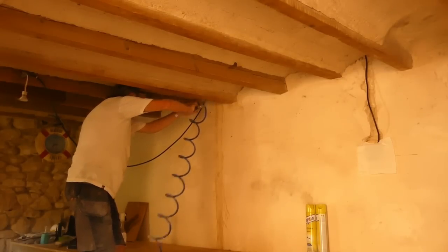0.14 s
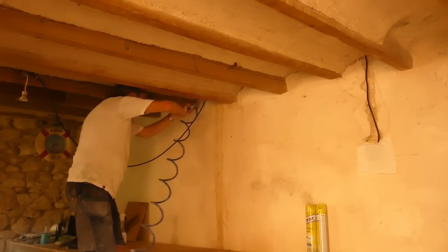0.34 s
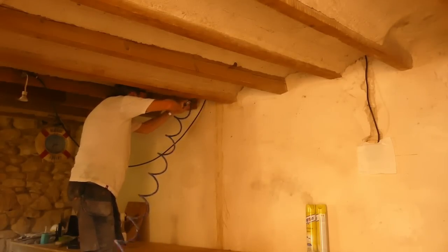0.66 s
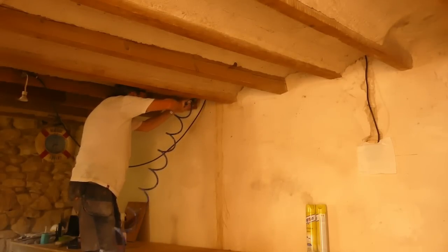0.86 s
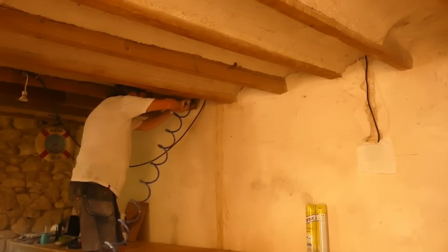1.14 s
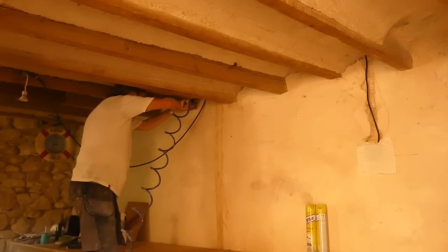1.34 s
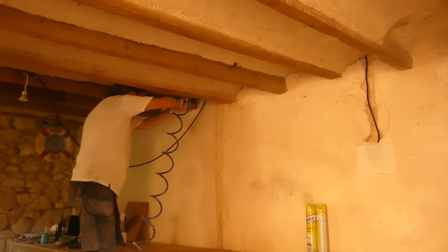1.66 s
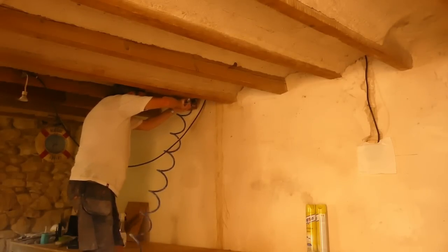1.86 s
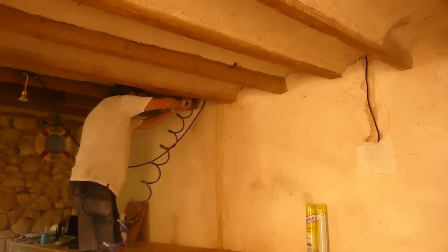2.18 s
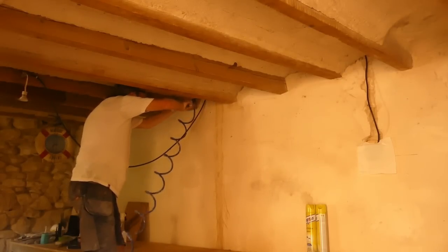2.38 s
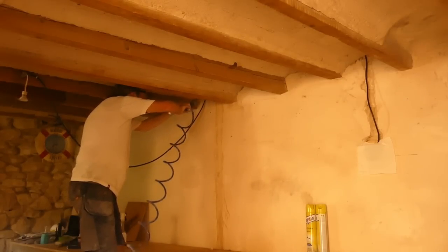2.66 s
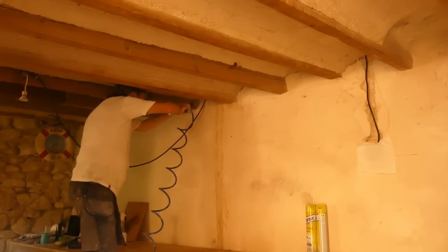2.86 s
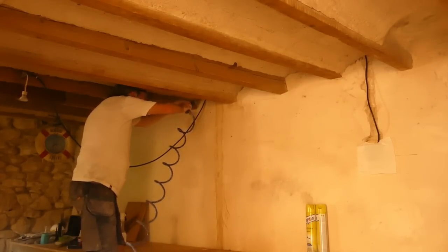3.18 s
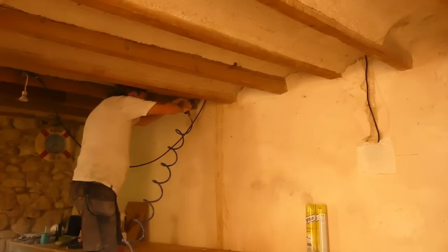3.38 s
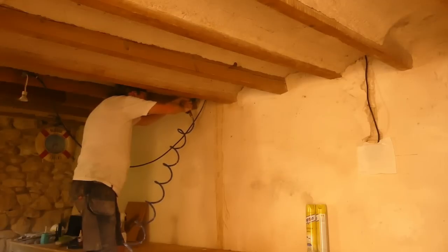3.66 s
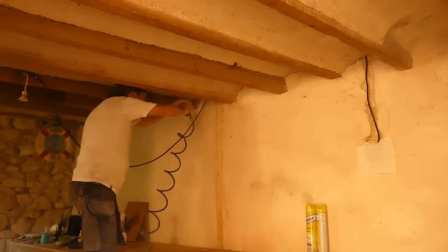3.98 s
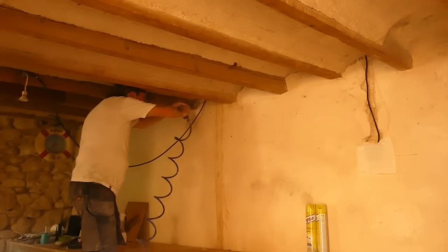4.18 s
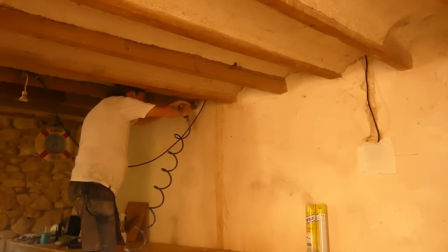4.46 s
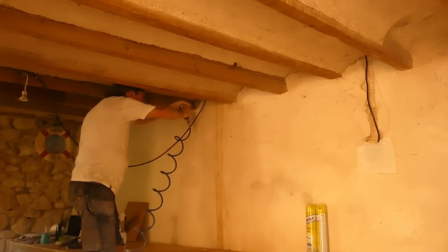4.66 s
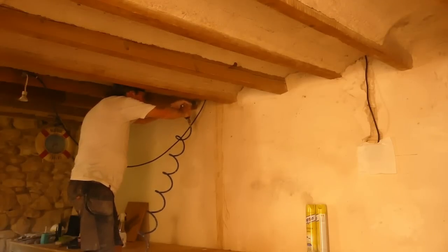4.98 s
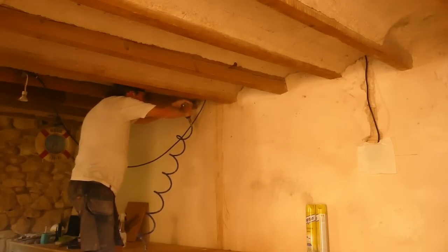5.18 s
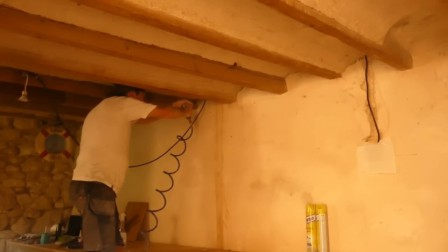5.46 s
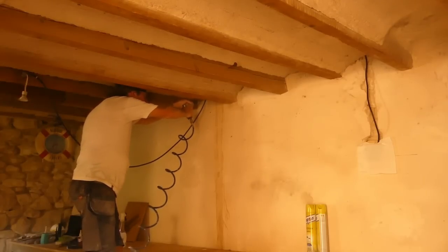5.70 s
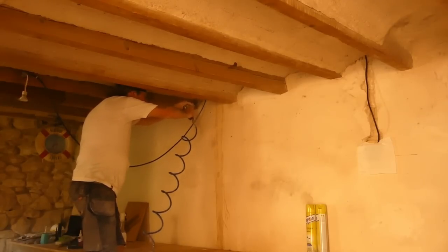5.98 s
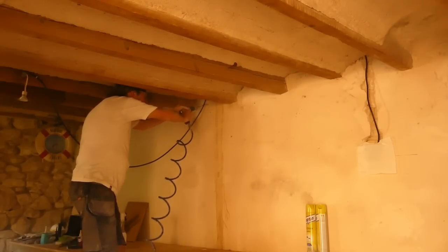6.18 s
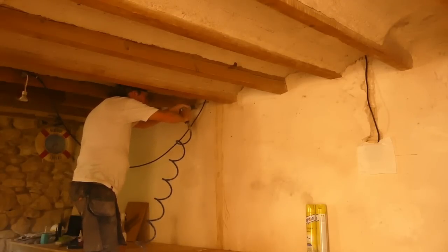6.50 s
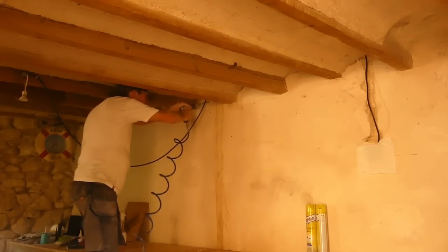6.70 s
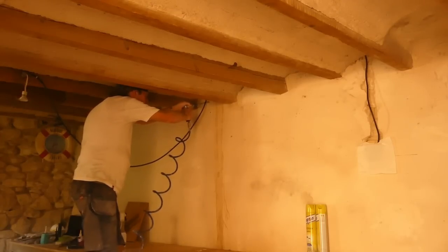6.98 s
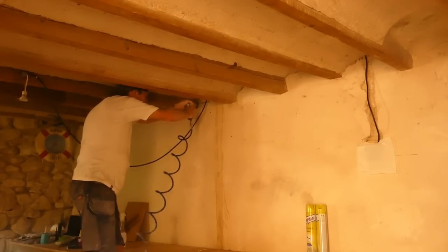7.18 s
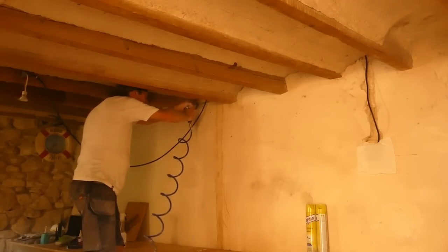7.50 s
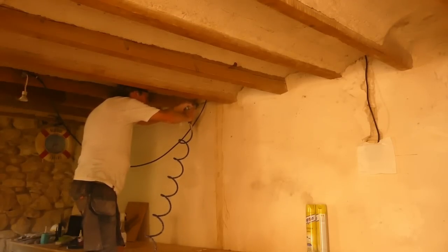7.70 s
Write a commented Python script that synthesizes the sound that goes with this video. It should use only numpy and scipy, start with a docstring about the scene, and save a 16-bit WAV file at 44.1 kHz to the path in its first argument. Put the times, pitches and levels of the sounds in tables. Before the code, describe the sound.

Indoors, four rapid pneumatic chisel bursts hammer into masonry, separated by falling rubble, pattering crumbs and a fine hiss of trickling sand.

```python
"""A bare room with a plastered stone wall: an air hammer chisels a channel into it in short bursts.
Each piston stroke thumps the wall, puffs out air as a dying hiss and makes the steel chisel ring and plaster crack.
In the pauses chunks crunch, clink and thud as they land, crumbs patter and fine sand hisses down the wall.
A faint machine hum stops just before the second burst; in the first pause the lifted chisel rings on.
The sound is nearly mono, and an automatic gain ducks it whenever the level passes a limit."""
import sys
import numpy as np
from scipy import signal
from scipy.fft import rfft, irfft, next_fast_len
from scipy.io import wavfile

SR = 44100
rng = np.random.default_rng(int(sys.argv[2]) if len(sys.argv) > 2 else 0)


def store_wav(level_fs):
    """Save 16-bit WAV to argv[1]."""
    pcm = np.round(np.clip(np.atleast_2d(level_fs), -1, 1) * 32767)
    wavfile.write(sys.argv[1], SR, pcm.T.astype(np.int16))


N = 345744
LEAD = SR // 2  # samples of run-up, so that hammer and room are already sounding at the start
TIME = np.arange(-LEAD, N) / SR  # s
SIZE = len(TIME)


def from_db(db):
    """Decibels to gain."""
    return 10 ** (np.asarray(db) / 20)


def unit_energy(x):
    """Scale a response so that it passes white noise at the same level."""
    return x / np.sqrt(np.sum(x ** 2) + 1e-20)


def at_hz(points, hz):
    """Read a table on a log-frequency axis."""
    f, value = np.transpose(points)
    return np.interp(np.log(np.maximum(hz, 1)), np.log(f), value)


def noise(spectrum):
    """Steady noise of a given colour, rms 1."""
    length = next_fast_len(SIZE)
    gain = from_db(at_hz(spectrum, np.linspace(0, SR / 2, length // 2 + 1)))
    coloured = irfft(rfft(rng.standard_normal(length)) * gain)[:SIZE]
    return unit_energy(coloured) * np.sqrt(SIZE)


def narrow(hz, width_hz):
    """Noise in one narrow resonance, rms 1: a tone that wavers faster the wider it is."""
    f = np.linspace(0, SR / 2, next_fast_len(SIZE) // 2 + 1)
    lines = rng.standard_normal(len(f)) + 1j * rng.standard_normal(len(f))
    resonance = 1 / (1 + ((f - hz) / width_hz * 2) ** 2)
    return unit_energy(irfft(lines * resonance)[:SIZE]) * np.sqrt(SIZE)


def butter(x, hz, kind, order=2):
    """Causal Butterworth filter."""
    return signal.sosfilt(signal.butter(order, hz, kind, fs=SR, output="sos"), x + 1e-18)


def lagged(x, lag_s):
    """One-pole average."""
    keep = np.exp(-1 / (lag_s * SR))
    return signal.lfilter([1 - keep], [1, -keep], x + 1e-18)


def clicks(times, sizes):
    """One impulse per contact."""
    at = np.clip(np.round(np.asarray(times) * SR).astype(int) + LEAD, 0, SIZE)
    return np.bincount(at, sizes, SIZE + 1)[:SIZE]


def through(x, response):
    """Play a signal through an impulse response."""
    return signal.oaconvolve(x, response)[:SIZE]


def fading(x, t60):
    """Each impulse becomes an envelope that jumps up and dies away by 60 dB in t60 seconds."""
    return signal.lfilter([1], [1, -from_db(-60 / (t60 * SR))], x + 1e-18)


def rings(modes):
    """One decaying wave per mode, its spectral peak at the mode's level; their energies sum to 1."""
    t = np.arange(SR // 2) / SR
    waves = [from_db(db - 60 * t / t60) / t60 * np.sin(2 * np.pi * hz * t) for hz, db, t60 in modes]
    return unit_energy(np.array(waves))


def strike(times, sizes, modes, spread_db):
    """Every contact excites every mode with a strength and sign of its own."""
    chance = rng.standard_normal((len(times), len(modes), 2))
    strength = from_db(spread_db * chance[..., 0]) * np.sign(chance[..., 1]) * sizes[:, None]
    waves = strength @ rings(modes)[:, :SR // 4]
    out = np.zeros(SIZE + SR)
    for s, wave in zip(times, waves):
        start = max(round(s * SR) + LEAD, 0)
        out[start:start + len(wave)] += wave
    return out[:SIZE]


# colour of the room tone: (f/Hz, relative level/dB per Hz)
ROOM_TONE = [(25, 0.5), (150, -13), (230, -9.5), (380, -6.5), (600, -14.5), (900, -15), (1800, -17),
             (2600, -24.5), (10000, -28.5), (16000, -36.5)]
# faint machine hum: (f/Hz, rms level/dB)
MACHINE_HUM = [(323, -74), (549, -67)]


def background(tone_db=-58.5, hum_ends_s=1.7, tone_drop_db=3):
    """Room tone under the hum and rumble of a distant machine; when it stops, the tone drops too."""
    hum = sum(np.sqrt(2) * from_db(db) * np.sin(2 * np.pi * hz * TIME) for hz, db in MACHINE_HUM)
    running = TIME < hum_ends_s
    return from_db(tone_db - tone_drop_db * ~running) * noise(ROOM_TONE) + hum * running


# how long each band lingers in the room: (f/Hz, T60/s)
ROOM_DECAY = [(80, 0.093), (280, 0.56), (700, 0.6), (2000, 0.27), (5000, 0.25), (9000, 0.18),
              (15000, 0.067)]


def diffuse(x, late_s=0.0031):
    """Dense reflections: each band's energy lingers as noise for its own time. Returns mid and side."""
    edges = np.geomspace(60, 17000, 17)  # Hz
    white = rng.standard_normal((2, 2, SIZE))
    out = 0
    for k, band in enumerate(zip(edges, edges[1:])):
        t60 = at_hz(ROOM_DECAY, np.sqrt(band[0] * band[1]))
        power = butter(x, band, "band", order=3) ** 2
        energy = lagged(lagged(power, t60 / np.log(1e6)), late_s)
        wash = butter(white[k % 2], band, "band", order=3)  # neighbouring bands use separate noise
        out = out + np.sqrt(energy) * wash / wash.std()
    return out


def reflections(x, count=48, first_s=.003, span_s=.06, t60=0.28, dull_hz=11000):
    """Early echoes off the nearby walls, beams and floor, weaker the later they arrive."""
    delay = first_s + span_s * rng.random(count)
    strength = from_db(-60 * delay / t60) * rng.choice([-1, 1], count)
    taps = np.bincount((delay * SR).astype(int), strength)
    return butter(through(x, unit_energy(taps)), dull_hz, "low", order=1)


def sand(swell_s=0.24, fade_db_per_s=17):
    """After each burst fine sand trickles down the wall as a soft hiss that swells and dies."""
    flow = 0
    for rate, (*_, sand_db) in zip(BLOW_RATES, HAMMER_BURSTS):
        since = np.maximum(TIME - rate[-1][0], 0)
        flow = flow + np.minimum(since / swell_s, 1) * from_db(sand_db - fade_db_per_s * since)
    return flow * noise([(800, -4.5), (2500, 5), (6000, -3.5), (10000, -7), (15500, -26)])


# colour of falling grit, for crumbs and rubble: (f/Hz, relative level/dB per Hz)
GRIT_COLOUR = [(400, 1.5), (1200, 1), (3000, 1), (5000, 2), (8000, -6.5), (11000, -9), (15500, -35)]


def crumbs(blow_times, fall_s=0.12, scatter_s=.42, level_db=-44, spread_db=4, tick_t60=0.0035):
    """Each blow loosens one crumb, which ticks on the floor after a fall of its own length."""
    times = blow_times + fall_s + scatter_s * rng.random(len(blow_times))
    uneven = np.clip(rng.standard_normal(len(times)), -2, 2)
    return fading(clicks(times, from_db(level_db + spread_db * uneven)), tick_t60) * noise(GRIT_COLOUR)


# chunks landing: (t/s, relative knock level/dB, relative gritty splash level/dB, top of the knock f/Hz)
CHUNKS = [(0.515, -32.5, -59, 1300), (.683, -64, -53.5, 4500), (0.71, -66, -49, 4500),
          (.997, -47, -48, 4500), (1.671, -44.5, -61.5, 4540), (2.635, -27.5, -23.5, 5000),
          (2.666, -11, -39.5, 5000), (2.831, -33, -52, 4500), (2.866, 5.5, -63, 4600),
          (2.972, -9, -18.5, 4800), (3.047, -8.5, -20, 5500), (3.158, -20, -60, 4000),
          (4.127, -7.5, -26, 6000), (4.317, -24.5, -44, 4000), (4.341, -24.5, -41, 3870),
          (4.417, -24.5, -45, 3870), (4.487, -29.5, -58, 4500), (4.513, -51, -34, 4500),
          (4.54, -23.5, -66, 4300), (6.261, -28.5, -36, 4500), (6.281, 0.5, -36, 4500),
          (6.485, -14, -66, 2220), (6.554, -25, -35, 3685)]
# colour of the crunch: (f/Hz, relative level/dB per Hz)
STONE_COLOUR = [(90, -49), (160, -5.5), (380, -7.5), (700, -6), (1300, -7), (2100, -1.5), (3100, -8),
                (4100, -17.5), (5200, -55), (9000, -84)]
# clink of a chunk as it lands: (f/Hz, relative level/dB, T60/s)
CHUNK_CLINK = [(953, -2, 0.24), (1280, -6.5, 0.26), (2060, 8.5, .15), (2184, 1, 0.39), (3480, -8.5, 0.021)]


def rubble(knock_db=-4, knock_t60=0.031, clink_db=7, span=6, splash_db=2, splash_t60=0.042):
    """Chunks crunch briefly as they land, clink in their own modes and shed a splash of grit."""
    times, knock, splash, tops = np.transpose(CHUNKS)
    stone = noise(STONE_COLOUR)
    out = fading(clicks(times, from_db(splash + splash_db)), splash_t60) * noise(GRIT_COLOUR)
    for s, db, top_hz in zip(times, knock, tops):
        crunch = fading(clicks([s], from_db([db + knock_db])), knock_t60) * stone
        clink = strike([s], from_db([db + clink_db]), CHUNK_CLINK, spread_db=2.0)
        # soft plaster lands duller than stone
        landing = butter(crunch + clink, top_hz / span, "high", order=1)
        out = out + butter(landing, top_hz, "low", order=5)
    return out


# ring of the chisel once it is lifted from the wall: (f/Hz, relative level/dB, T60/s)
FREE_CHISEL = [(1200, -13.5, 3.5), (2110, -11, 2.6), (4960, 9, 0.38), (9100, 5.5, 0.5)]


def ring_out(lift_s=0.076, level_db=-45, waver=0.039):
    """Free of the wall the chisel is hardly damped: a faint wavering ring, steady until the lift, then dying."""
    t = np.maximum(TIME - lift_s, 0)
    return sum(from_db(level_db + db - 60 * t / t60) * narrow(hz, waver * hz) for hz, db, t60 in FREE_CHISEL)


# bursts: (trigger squeezed t/s, relative force level/dB, relative wall boom level/dB,
#          extra level on the first blow/dB, level lost by the last blow/dB, loosened sand level/dB)
HAMMER_BURSTS = [(-.42, -2.5, -8, 7, 1.5, -53), (1.719, 1, 0, 0.5, 19, -37.5),
                 (3.478, -2.5, 1.5, -1, 43, -47.5), (4.817, -1.5, -0.5, -2, 15, -48),
                 (7.025, -5.5, 0, 0.5, -0.5, -72)]
# piston speed from first blow to last, one curve per burst: (t/s, blows per s)
BLOW_RATES = [
    [(-.4, 39.5), (.025, 39.5)],
    [(1.729, 38.53), (1.79, 43.58), (2.01, 40.45), (2.377, 42.37), (2.509, 40.86)],
    [(3.484, 39.81), (3.592, 44.4), (3.895, 41.31), (4.029, 30.69)],
    [(4.827, 37.7), (4.912, 43.42), (5.19, 40.57), (5.348, 46.83), (5.56, 45.06), (5.682, 39.94),
     (6.08, 37.8)],
    [(7.072, 39.43), (7.246, 44.3), (7.324, 43.12), (7.4, 47.77), (7.528, 38.77), (7.826, 40.09)],
]
# what every blow sets off, before its own force
BOOM_DB, THUMP_DB, HISS_DB, RING_DB = -14.5, -12.5, -17, -22
# the full hose changes the force of the first blows; then the pressure sags
SURGE_S, SAG_DB_PER_S = 0.13, 4.5
# the last blows change in force as the trigger is let go
RELEASE_S = 0.022
# the chisel rings more until it is seated, and again as it is eased off the wall
LOOSE_DB, SEAT_S, EASE_S = 4, .04, .09


def blows():
    """The piston strikes once per cycle: rows of time, boom, thump, hiss and ring strength."""
    rows = []
    for rate, (_, force_db, boom_db, surge_db, loss_db, _) in zip(BLOW_RATES, HAMMER_BURSTS):
        s, per_s = np.transpose(rate)
        t = np.arange(s[0], s[-1], 1 / SR)
        cycles = np.cumsum(np.interp(t, s, per_s)) / SR
        times = np.interp(np.arange(int(cycles[-1]) + 1), cycles, t)
        since, until = times - times[0], times[-1] - times
        surge = surge_db * np.exp(-since / SURGE_S)
        loss = loss_db * np.exp(-until / RELEASE_S)
        force = force_db + surge - SAG_DB_PER_S * since - loss
        loose = LOOSE_DB * (np.exp(-since / SEAT_S) + np.exp(-until / EASE_S))
        period = SR / np.interp(times, s, per_s)  # a blow carries the energy of one whole cycle
        parts = (BOOM_DB + boom_db, THUMP_DB, HISS_DB, RING_DB + loose)
        rows.append([times] + [from_db(force + db) * np.sqrt(period) for db in parts])
    return np.hstack(rows)


# boom of wall and room: (f/Hz, relative level/dB, T60/s)
WALL_BOOM = [(92.5, 0, 0.75), (127.6, -15, 0.67), (160.6, 0.5, 0.55), (198.2, 11, 0.63),
             (228.7, 16.5, 0.23)]
# higher resonances of wall and beams: (f/Hz, relative level/dB, T60/s)
BEAM_RING = [(269, 3, 0.063), (295.7, 8.5, 0.46), (320.9, 9, 0.52), (371.4, 2.5, 0.87), (445, -15.5, 1),
             (468, -4, 0.37), (470, -6, 0.86), (618, -5.5, 0.14), (777.4, 0, 0.39)]


def thumps(booms, pushes, puff_band_hz=(250, 420), puff_db=-11, wall_db=-1, beam_db=1,
           rumble_hz=68, beam_low_hz=230, soft_hz=560):
    """Each push is a short, soft pressure pulse followed by the ringing of wall and beams."""
    puff = unit_energy(butter(signal.unit_impulse(SR // 10), puff_band_hz, "band"))
    beams = butter(through(pushes, rings(BEAM_RING).sum(0)), beam_low_hz, "high")
    wall = butter(through(booms, rings(WALL_BOOM).sum(0)), rumble_hz, "high", order=4)
    body = from_db(puff_db) * through(pushes, puff) + from_db(beam_db) * beams + from_db(wall_db) * wall
    return butter(body, soft_hz, "low")


def valve(shut_db=-65, leak_db=-25.5, rise_s=0.023, fade_s=0.15):
    """Level of the air leak: it swells as the trigger is squeezed, holds, and fades once the piston runs."""
    out = 0
    for rate, (squeezed, *_) in zip(BLOW_RATES, HAMMER_BURSTS):
        first = max(rate[0][0], squeezed)
        when = [squeezed - rise_s, squeezed, first, first + fade_s]
        level = np.interp(TIME, when, [shut_db, leak_db, leak_db, shut_db], left=-np.inf, right=-np.inf)
        out = out + from_db(level)
    return out


# colour of the air jet: (f/Hz, relative level/dB per Hz)
JET_COLOUR = [(260, -29), (450, -6.5), (530, 2), (572, -5), (843, -2), (1050, -10.5), (1300, -6),
              (2070, -5.5), (2400, -9.5), (6830, -8.5), (9480, -3.5), (11700, -14), (16000, -13.5)]
# the jet whistles at the edges of the port: (f/Hz, width/Hz, level against the jet/dB)
PORT_WHISTLES = [(7970, 160, -14.5), (9330, 69, -10), (13500, 200, -20), (14900, 70, -26),
                 (15490, 42, -14.5)]


def exhaust(times, sizes, vent_t60=0.12, vent_db=-2.5, uneven_db=1.85):
    """The port opens on every stroke and the jet dies down; the valve leaks around the start of a burst."""
    uneven = from_db(uneven_db * rng.standard_normal(len(times)))
    vents = fading(clicks(times, sizes * uneven), vent_t60)
    vents = vents * np.sqrt(np.log(1e6) / (vent_t60 * SR))  # same energy per puff whatever its length
    whistles = sum(from_db(db) * narrow(hz, width_hz) for hz, width_hz, db in PORT_WHISTLES)
    return (from_db(vent_db) * vents + valve()) * (noise(JET_COLOUR) + whistles)


# chisel and barrel: (f/Hz, relative level/dB, T60/s)
STEEL_RING = [(1309, 0, 0.026), (2083, 0.5, 0.0073), (2700, -0.5, 0.033), (4500, -12.5, 0.048),
              (6400, -7.5, 0.026), (8000, -0.5, 0.058), (10700, -0.5, 0.059), (9530, 2, 0.042),
              (9350, 7, 0.0057), (12200, 6, 0.053), (15000, -23, 0.031), (15490, 3.5, 0.18)]


def chisel(times, sizes, forces, ring_db=-5, crack_db=-30, crack_t60=0.041, bite_db=1.5, jitter_s=.0003):
    """Steel rings in its modes and plaster cracks as a noise burst; some blows bite harder than others."""
    late, bite = rng.standard_normal((2, len(times)))
    times = times + jitter_s * late
    bite = from_db(bite_db * np.clip(bite, -2, 2))
    plaster = noise([(1000, -15.0), (4000, 0), (7000, -14.5), (9500, -10.0), (12000, -23.5), (16000, -0.5)])
    crack = fading(clicks(times, forces * bite), crack_t60) * plaster
    ring = strike(times, sizes * bite, STEEL_RING, spread_db=6.5)
    return from_db(ring_db) * ring + from_db(crack_db) * crack


def gain_control(x, limit_db=-14, attack_s=0.012, release_db_per_s=30, window_s=0.0034):
    """The gain drops quickly when the first channel's level passes the limit and creeps back afterwards."""
    over = np.maximum(10 * np.log10(lagged(x[0] ** 2, window_s)) - limit_db, 0)
    creep = release_db_per_s * TIME
    held = np.maximum.accumulate(over + creep) - creep
    return x * from_db(-lagged(held, attack_s))


# dull low thuds: tool bumps, piston stirs before a burst, heavy chunks landing on a board:
# (t/s, relative level/dB)
LOW_THUDS = [(.082, 0), (.138, -6), (.194, -9.5), (0.999, -14), (3.456, -13), (4.532, -14.5), (6.291, -3.5),
             (6.484, -11.5), (6.667, -22.5), (7.014, -8), (7.039, 0)]


def scene(puff_lead_s=0.002036, thump_echo_db=-9, tool_echo_db=0, rubble_echo_db=-4, thump_room_db=-10.5,
          tool_room_db=-6, rubble_room_db=-2, side_db=-14, side_low_hz=420, port_hiss_db=-72):
    """Hammer and rubble in the room, as picked up by two close ports under automatic gain."""
    times, boom, thump, hiss, ring = blows()
    thud_s, thud_db = np.transpose(LOW_THUDS)
    late, force = rng.standard_normal((2, len(times)))
    pushed = times - puff_lead_s + .00014 * late
    uneven = from_db(.7 * force)
    thuds = clicks(thud_s, from_db(thud_db))
    low = thumps(clicks(pushed, boom * uneven) + thuds, clicks(pushed, thump * uneven) + thuds)
    tool = exhaust(times - .0015, hiss) + chisel(times, ring, hiss)
    falling = rubble() + crumbs(times[times > 1])  # no crumbs from the first burst
    # early echoes first, then the diffuse tail that they feed
    low = low + from_db(thump_echo_db) * reflections(low)
    tool = tool + from_db(tool_echo_db) * reflections(tool)
    falling = falling + from_db(rubble_echo_db) * reflections(falling)
    room, room_side = diffuse(from_db(thump_room_db) * low + from_db(tool_room_db) * tool)
    rubble_room = from_db(rubble_room_db) * diffuse(falling)[0]
    mid = low + tool + room + falling + rubble_room + ring_out() + sand() + background()
    port_hiss = noise([(50, 15), (300, -6.5), (1500, -10.0), (5000, -8.5), (15000, -14.5)])
    side = from_db(side_db) * butter(room_side, side_low_hz, "high", order=1)
    side = side + from_db(port_hiss_db) * port_hiss
    return gain_control(np.array([mid + side, mid - side]))[:, LEAD:]


def record(dry, notch_hz=5940, notch_q=70, cutoff_hz=15900):
    """The recorder has a narrow notch, clips peaks beyond full scale and cuts the top."""
    notched = signal.lfilter(*signal.iirnotch(notch_hz, notch_q, fs=SR), dry)
    top_cut = signal.ellip(10, .2, 80, cutoff_hz, fs=SR, output="sos")
    return signal.sosfilt(top_cut, np.clip(notched, -1, 1))


dry = scene()
out = record(dry)
store_wav(out)
```